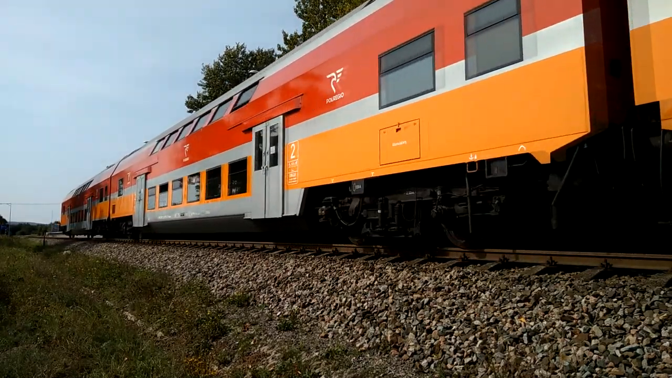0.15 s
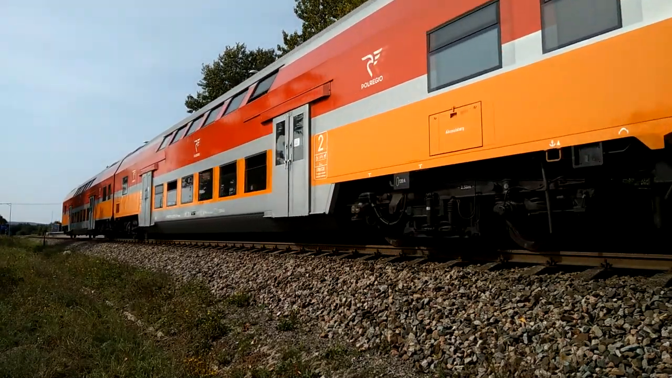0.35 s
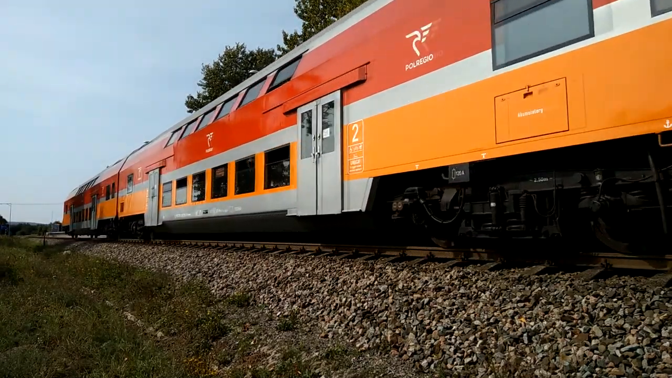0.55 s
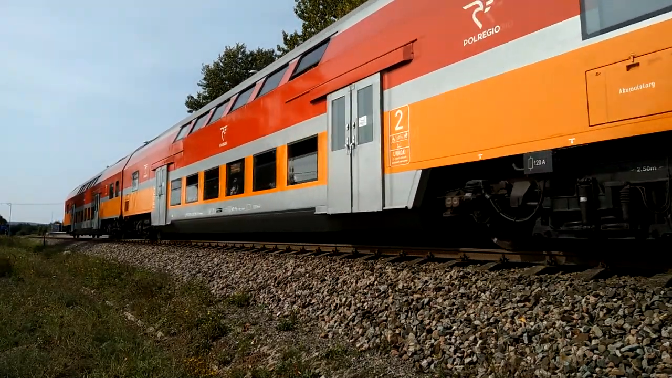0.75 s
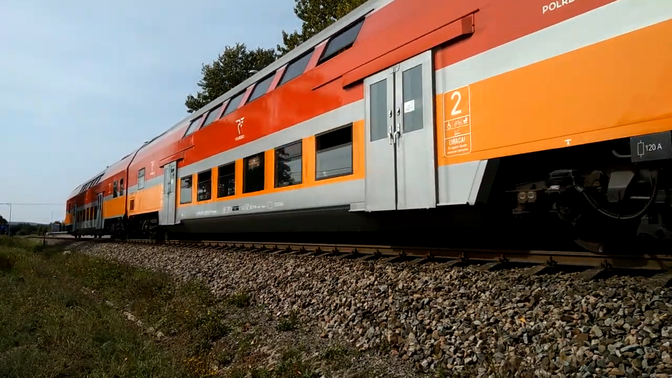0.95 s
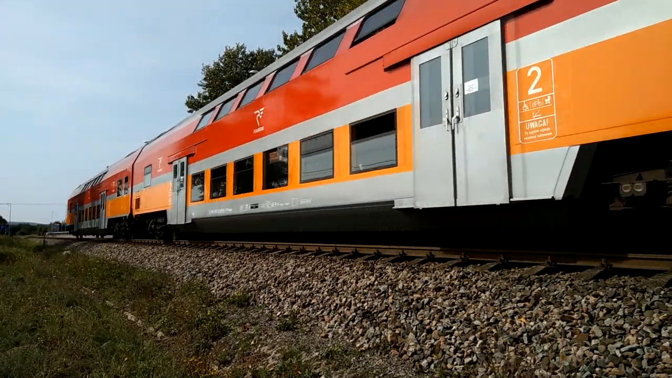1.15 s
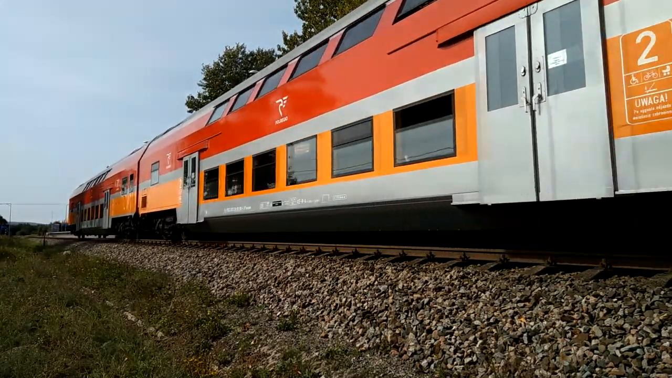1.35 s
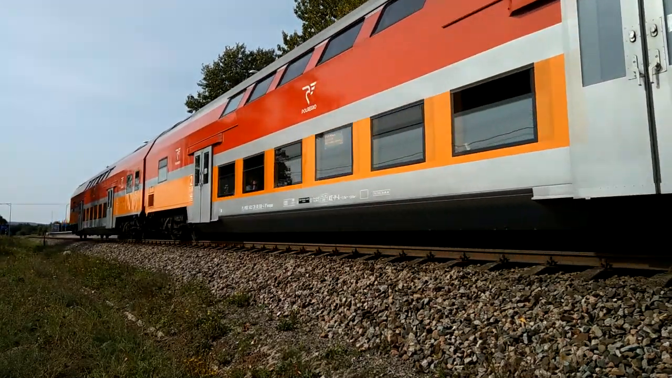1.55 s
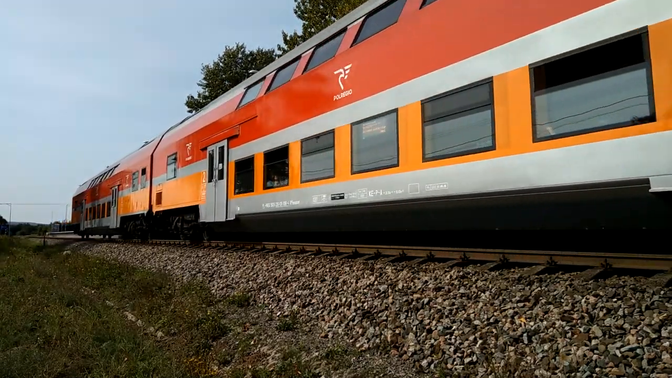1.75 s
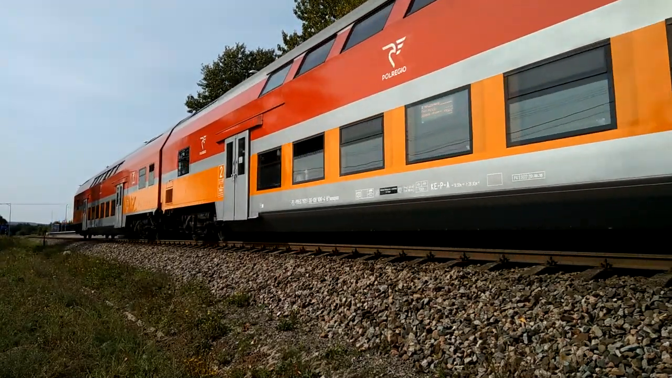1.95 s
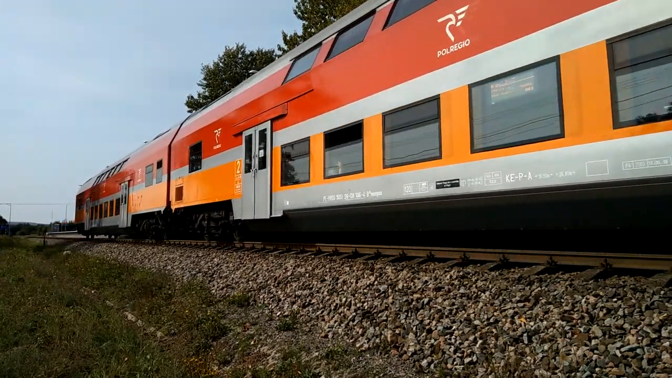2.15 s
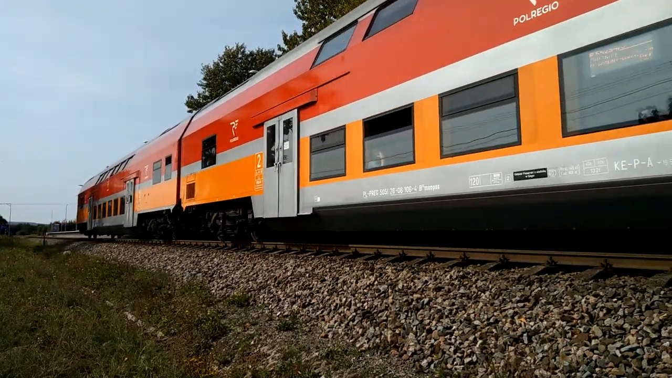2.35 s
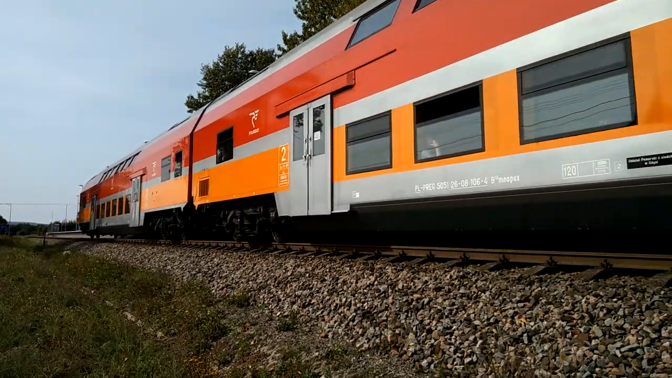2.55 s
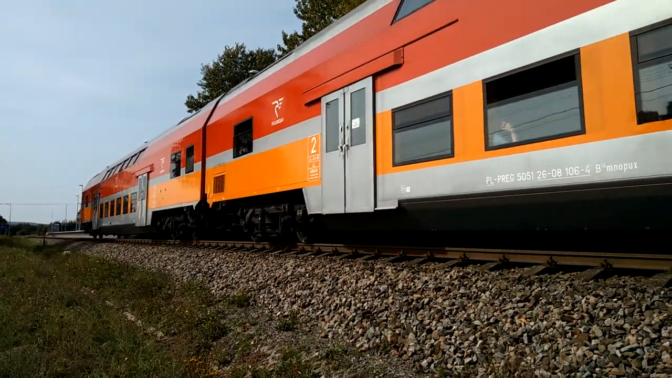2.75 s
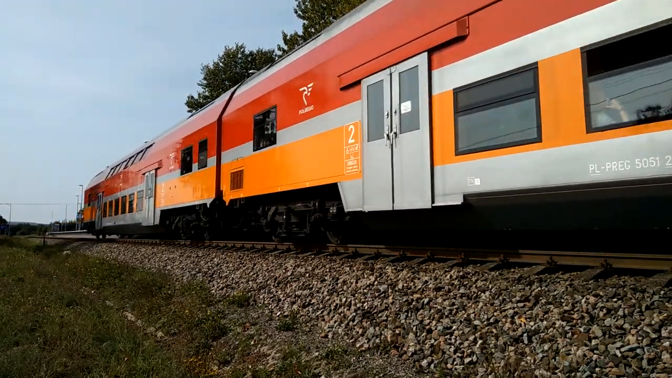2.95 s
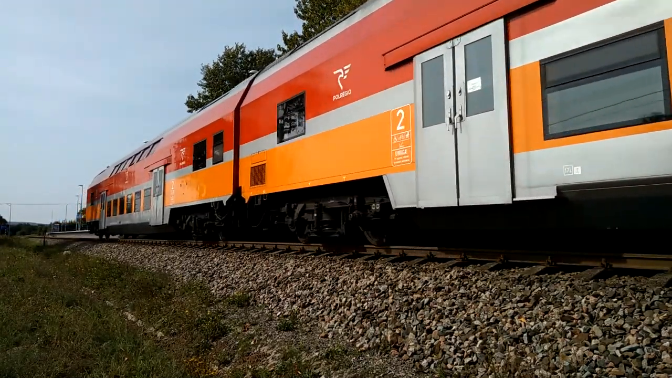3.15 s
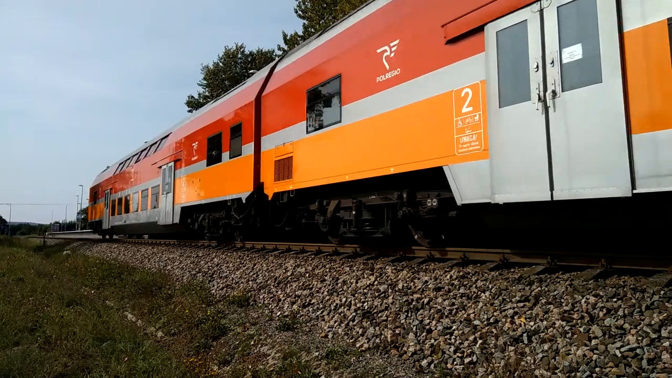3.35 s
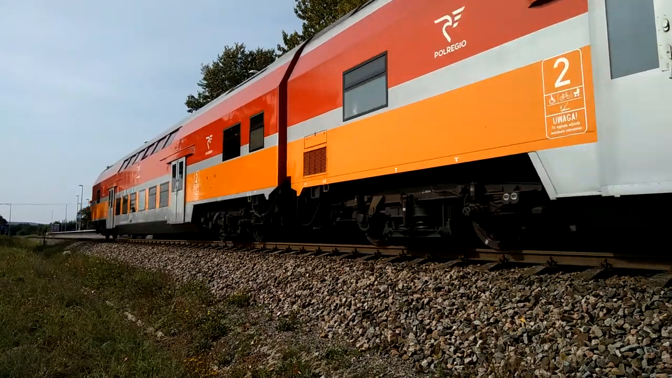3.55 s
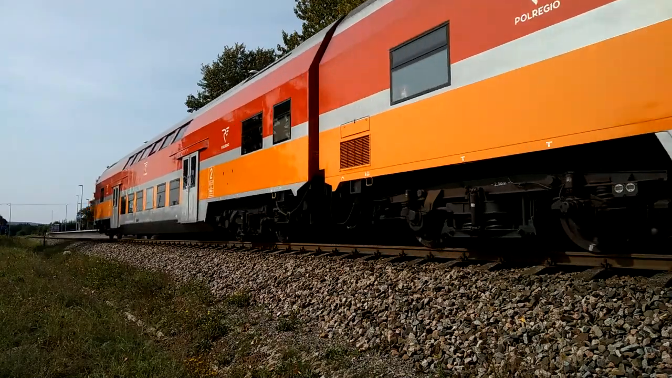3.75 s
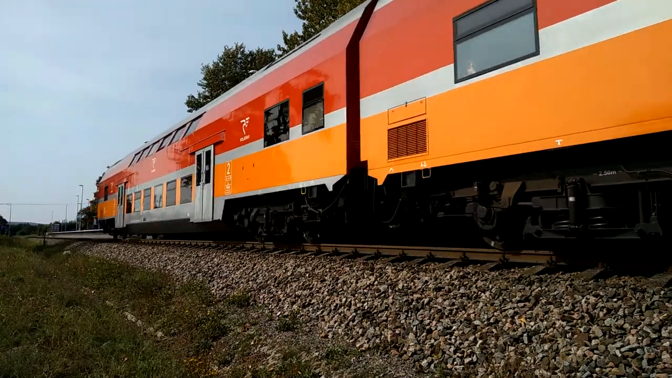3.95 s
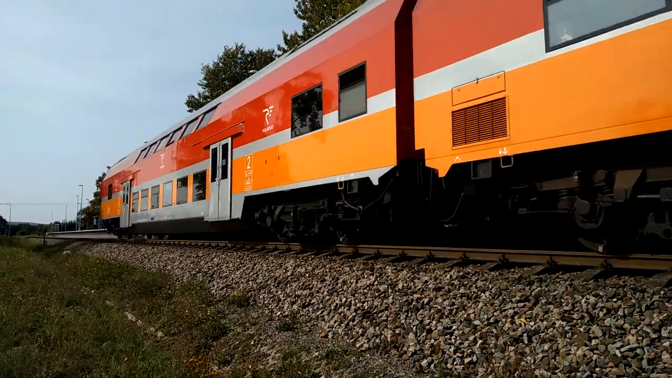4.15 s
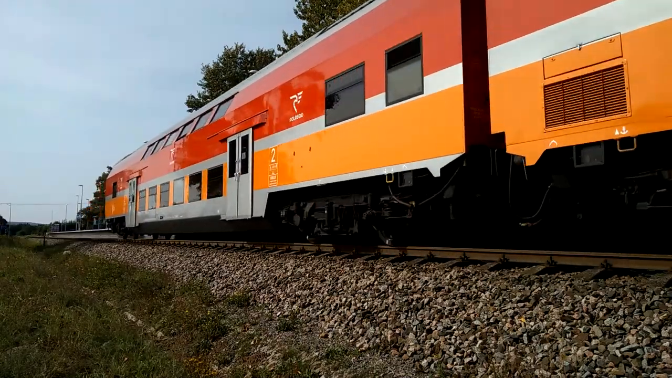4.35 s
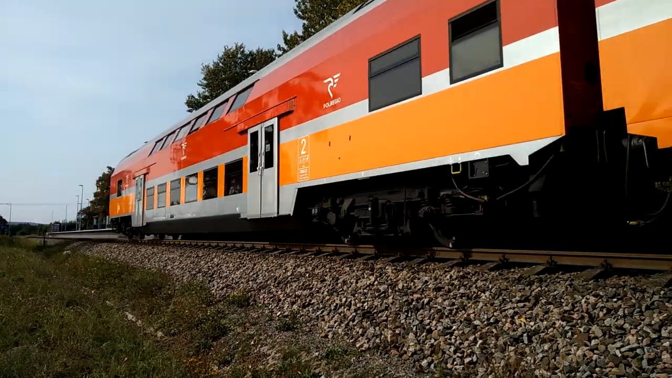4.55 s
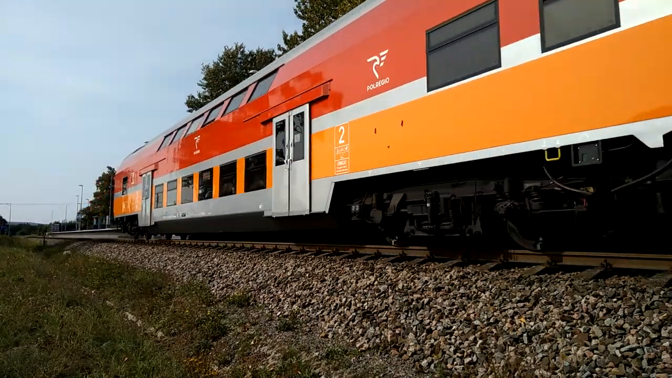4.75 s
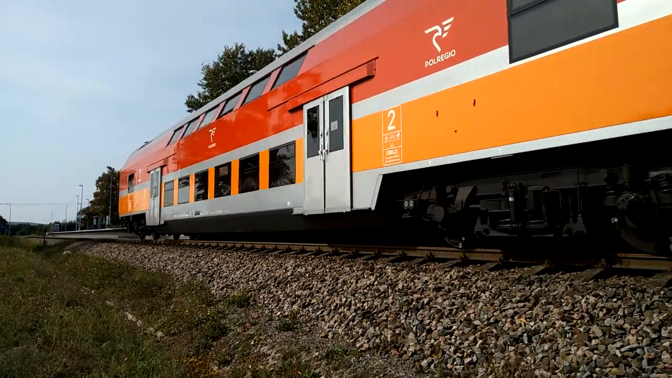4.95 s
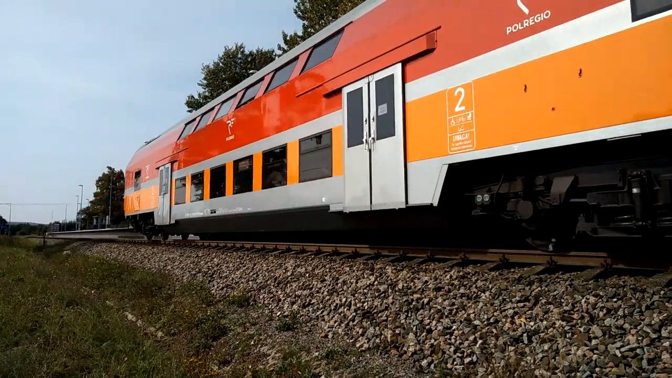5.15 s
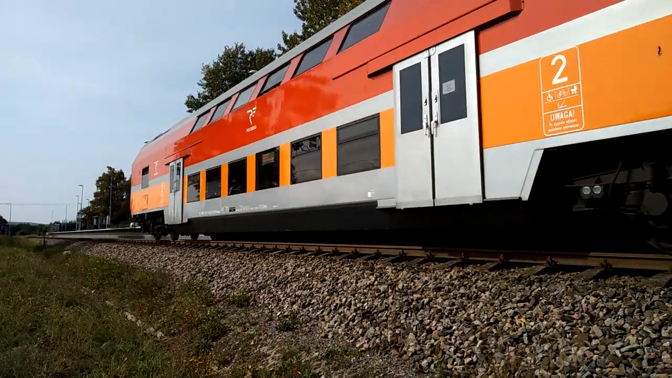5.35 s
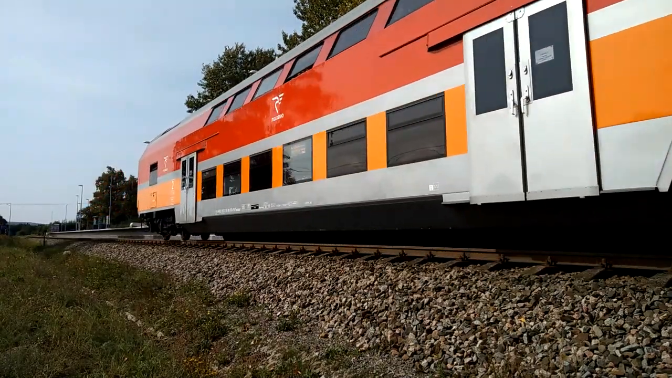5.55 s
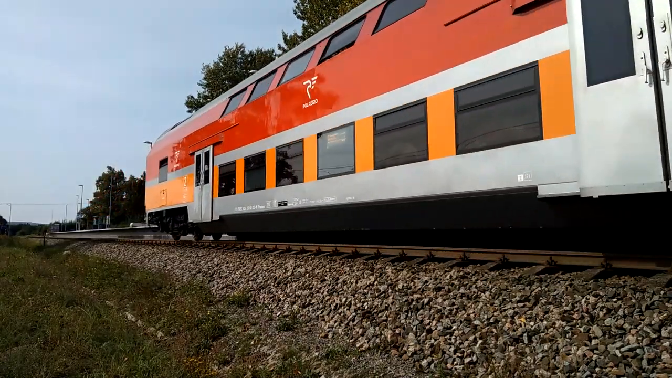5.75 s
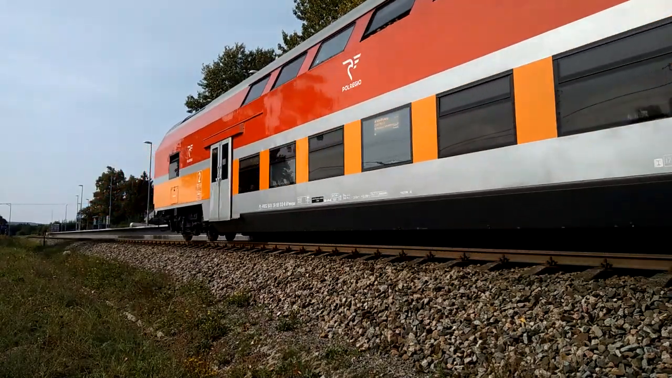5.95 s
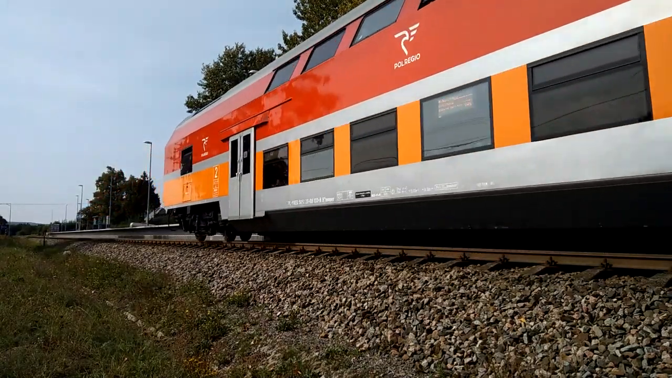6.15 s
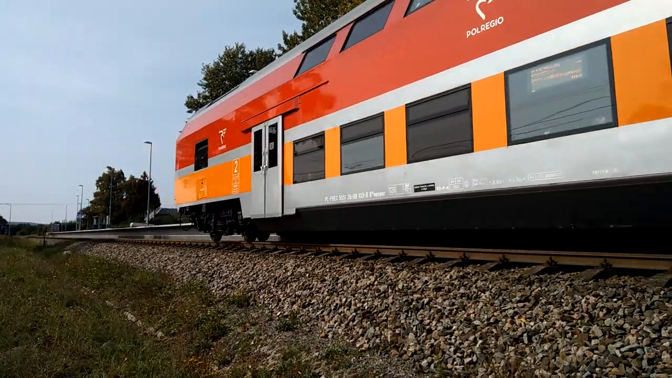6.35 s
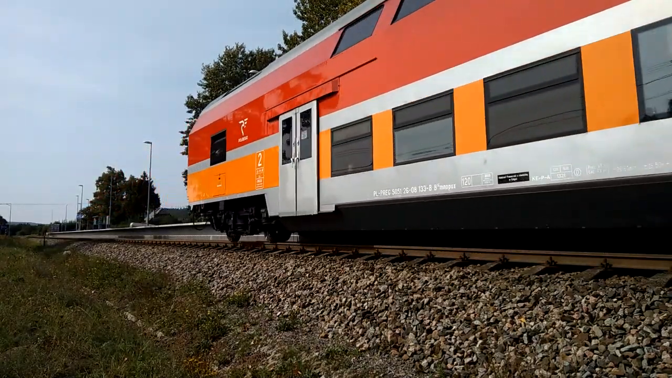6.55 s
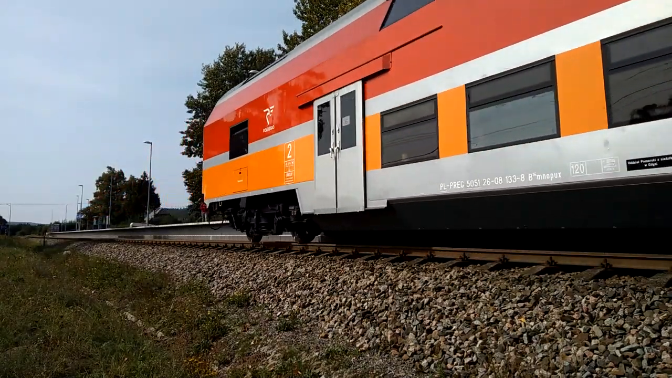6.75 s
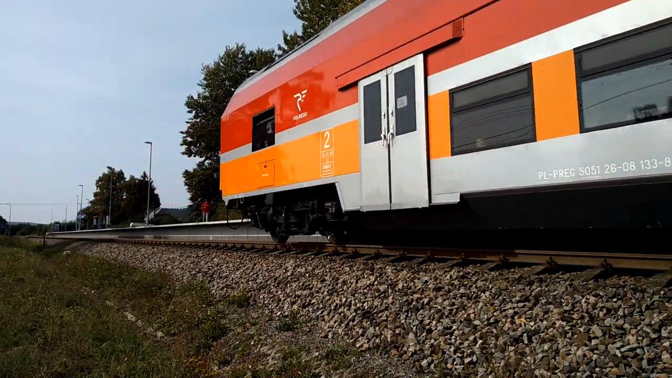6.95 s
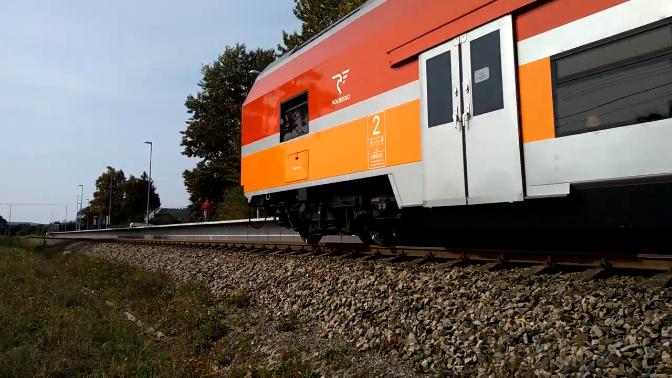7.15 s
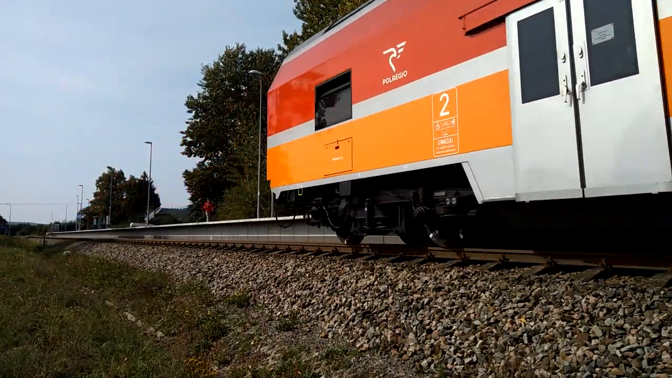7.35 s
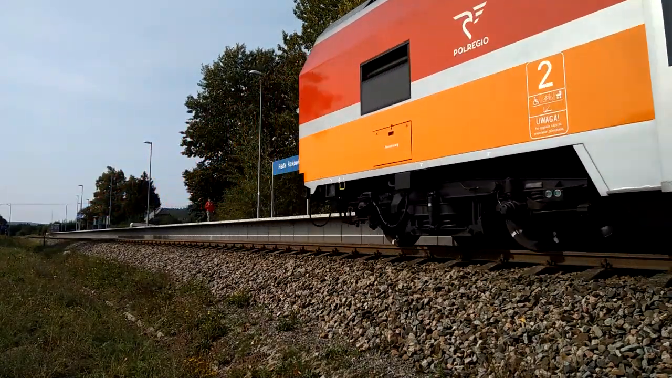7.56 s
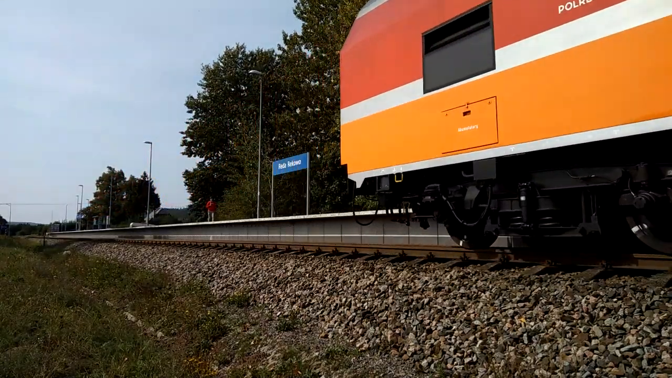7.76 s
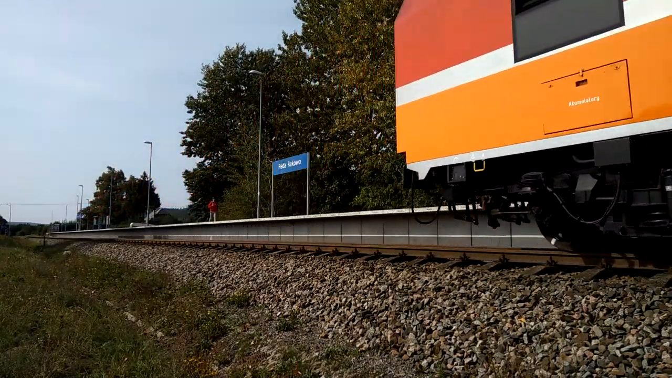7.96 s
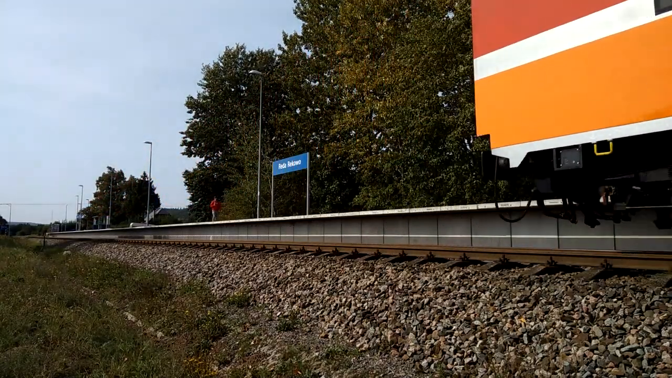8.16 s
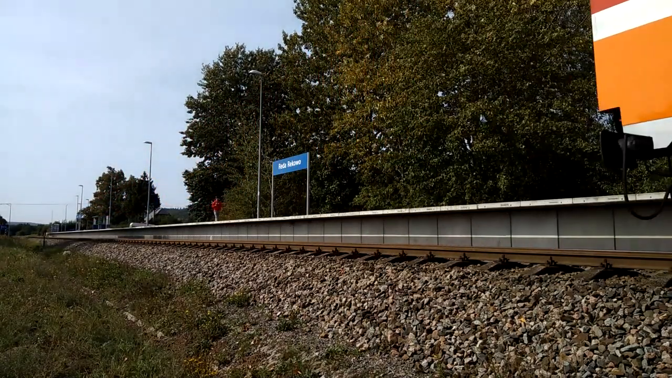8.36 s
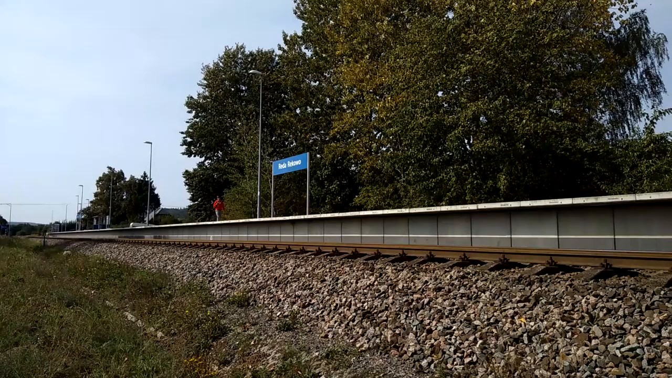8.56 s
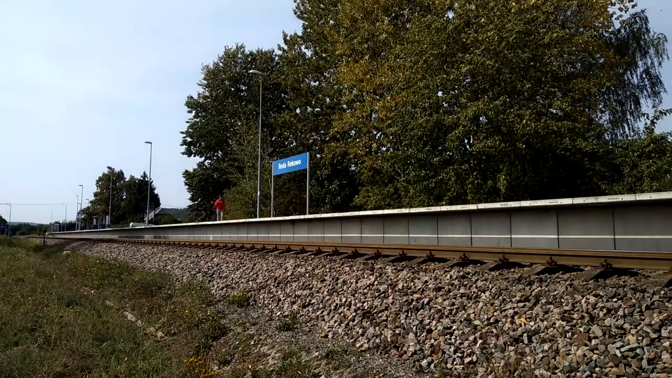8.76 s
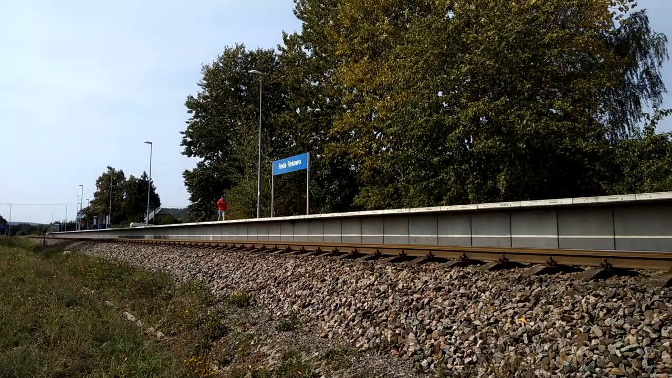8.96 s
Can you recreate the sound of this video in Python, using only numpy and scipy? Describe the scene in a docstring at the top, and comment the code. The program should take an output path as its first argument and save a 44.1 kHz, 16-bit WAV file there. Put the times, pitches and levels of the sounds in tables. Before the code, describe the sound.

A diesel train passes close by and fades: throbbing exhaust, rumbling wheels, a few hollow knocks and brief steel squeaks.

```python
"""A diesel locomotive, already past, hauls double-deck coaches by a microphone beside the track.
At first its exhaust throbs and a cooling fan hums briefly; rough wheels roar, rails hiss under each bogie.
As the engine recedes, slack running gear knocks from 3.2 s on, and a wheel rings at 4.7 s.
Around 7 s steel sticks and slips on the last coach: three short squeaks stand out.
After 8 s its wake buffets the microphone and its wheels ring as they leave."""
import sys
import numpy as np
from scipy import signal
from scipy.fft import rfft, irfft
from scipy.io import wavfile
from scipy.ndimage import uniform_filter1d

SR = 44100
rng = np.random.default_rng(int(sys.argv[2]) if len(sys.argv) > 2 else 0)


def to_wav(sig):
    """Store sig (one row per channel, or 1-D mono) as 16-bit WAV at the path in sys.argv[1].

    Samples outside -1..1 are clipped; the rate is SR.
    """
    pcm = np.clip(np.atleast_2d(sig), -1, 1) * 32767
    pcm = np.round(pcm).astype(np.int16)
    wavfile.write(sys.argv[1], SR, pcm.T)  # frames by channels


N = 401310
TIME = np.arange(N) / SR
TRAIN_M_PER_S, TRACK_DISTANCE_M = 6.16, 4.4
CUTOFF_HZ = 15720


def amp(db):
    """Decibels to gain."""
    return 10 ** (np.asarray(db) / 20)


def unit(x):
    """Scales to rms 1."""
    return x / np.sqrt(np.mean(x ** 2) + 1e-20)


def bump(x, centre, half_width):
    """Bell of height 1, down to 1/e at half_width."""
    return np.exp(-((x - centre) / half_width) ** 2)


def curve(rows, t):
    """Linear interpolation in time."""
    return np.interp(t, *np.transpose(rows))


def spectrum(points, hz):
    """Linear interpolation in log frequency."""
    f, value = np.transpose(points)
    return np.interp(np.log(hz + 1), np.log(f), value)


def add(mix, start_s, sound):
    """Adds a stereo sound into the mix."""
    part = mix[:, max(round(start_s * SR), 0):][:, :sound.shape[1]]
    part += sound[:, :part.shape[1]]


def ports(x, lead_ms):
    """The left microphone port hears x lead_ms before the right."""
    t_ms = np.arange(len(x)) * 1000 / SR
    return np.array([x, np.interp(t_ms - lead_ms, t_ms, x)])


def drift(rate_hz, size=2 ** 19):
    """Smooth random wander, rms about 1, up to about rate_hz."""
    lowpass = bump(np.fft.rfftfreq(size, 1 / SR), 0, rate_hz)
    return unit(irfft(rfft(rng.standard_normal(size)) * lowpass))[:N]


def farness(t):
    """0 while the locomotive is near, 1 once it is far."""
    return np.clip((t - 1.0) / 2.5, 0, 1)


def receding_db(t, start_m, doubling_db):
    """A source start_m away at first loses doubling_db per doubling of distance."""
    return -doubling_db * np.log2(1 + TRAIN_M_PER_S * t / start_m)


# Main noise direction: t/s, side (-1 right to 1 left, clipped)
NOISE_SIDE = [(0, -1.4), (1, -0.51), (2, 0.016), (4, 0.59), (5, 0.96), (7, 1), (8.2, 0.95)]
# Sound arriving direct: f/Hz, share (0-1)
DIRECT_SHARE = [(60, 0.81), (150, 0.98), (300, 0.98), (1400, 1), (2600, 0.7), (5000, 0), (14000, 0)]


def track_noise(colour_db, patchy_db, size=4096, port_gap_ms=0.42):
    """Noise of rms 1 with flickering patches, reaching both ports from all along the track."""
    hop = size // 4
    hz = np.fft.rfftfreq(size, 1 / SR)
    t = np.arange(N // hop + 5)[:, None] * hop / SR
    left_re, left_im, diffuse_re, diffuse_im, patches = rng.standard_normal((5, len(t), len(hz)))
    left, diffuse = left_re + 1j * left_im, diffuse_re + 1j * diffuse_im
    patches = unit(uniform_filter1d(uniform_filter1d(patches, size=9, axis=0), size=12, axis=1))
    # 32 directions, each reaching the nearer port first
    bearing = np.cos(np.pi * (np.arange(32) + .5) / 32)[:, None]
    delays = np.exp(-2j * np.pi * hz * bearing * port_gap_ms / 1000)
    side = np.clip(curve(NOISE_SIDE, t), -1, 1)
    direct = np.clip(spectrum(DIRECT_SHARE, hz), 0, .995)
    coherence = direct * (delays.mean(0) + side * (bearing * delays).mean(0))
    right = coherence * left + np.sqrt(np.maximum(1 - abs(coherence) ** 2, 0)) * diffuse
    frames = np.array([left, right]) * amp(colour_db(t, hz) + patchy_db * patches)
    _, noise = signal.istft(frames.swapaxes(1, 2), nperseg=size, noverlap=size - hop)
    return unit(noise[:, :N])


def resonance(t, hz, centre_hz, width_hz, wax_share=0.16):
    """Spectral peak whose height waxes and wanes around 1."""
    rates_hz, phases = rng.uniform(.4, 3.5, 10), rng.random(10)
    waxing = unit(np.sin(2 * np.pi * (rates_hz * t + phases)).sum(1, keepdims=True))
    return (1 + wax_share * waxing) * bump(hz, centre_hz, width_hz) ** 2


# Wheel and track resonances: f/Hz, width/Hz, near lift/dB, far lift/dB
WHEEL_TRACK_MODES = [(463.5, 37, 6, 4), (718, 21, 2.5, 6), (803.7, 15, 5, 8), (990, 67, -1.5, 0.5),
                     (1614, 155, -2.5, 2.5), (2680, 140, -2, 1)]
# Hollow coach bodies: f/Hz, width/Hz, near lift/dB, far lift/dB
COACH_MODES = [(200.8, 11.8, 5, 6.5), (238.2, 6.6, 5.5, 5), (426, 15, -3.5, 2), (517.5, 44, 1.5, 5),
               (605.6, 18, 1.5, 9.5)]
# Open track behind the last coach: f/Hz, width/Hz, lift/dB
OPEN_TRACK_MODES = [(260, 27, 9), (510, 65, 7), (1720, 70, 5.5), (2120, 110, 2)]
# Parts humming out in turn: t/s, half length/s, f/Hz, lift/dB
PART_HUMS = [(0.303, 0.97, 238, 3.5), (1.004, .2, 728, 2), (1.9, 1.04, 742, 7), (2.256, 1.2, 332, 14.5),
             (3.8, 1.5, 466, 4.5), (5.08, 0.37, 734, 13.5), (7.304, 0.27, 800, 5), (7.7, 0.23, 1004, 7),
             (7.7, 0.94, 427, 7)]


def ringing_db(t, hz, train_end_s=8.05, crossfade_s=0.38, hum_width_share=0.039):
    """Lift of the noise by resonances and hums; the coaches take theirs with them."""
    far = farness(t)
    behind = (1 + np.tanh((t - train_end_s) / crossfade_s)) / 2
    track, coaches = (sum((near_db + far * (far_db - near_db)) * resonance(t, hz, f, width_hz)
                          for f, width_hz, near_db, far_db in modes)
                      for modes in (WHEEL_TRACK_MODES, COACH_MODES))
    open_track = sum(db * resonance(t, hz, f, width_hz) for f, width_hz, db in OPEN_TRACK_MODES)
    hums = sum(db * bump(t, s, half_s) * bump(hz, f, hum_width_share * f) ** 2
               for s, half_s, f, db in PART_HUMS)
    return track + (1 - behind) * coaches + behind * open_track + hums


# Engine working cycles: t/s, rate/Hz
CYCLE_RATE = [(1.6, 8.09), (3.6, 8.18), (9.1, 8.19)]
# Exhaust lines: order (multiple of the cycle rate), near level/dB, far level/dB
EXHAUST_LINES = [(4, -23, -12.5), (5, -30, -21), (6.5, -1, -8), (7, -6, -2.5), (8, -5.5, -7), (9, -3, -3.5),
                 (10, -2, -7), (11, -7, -7), (12, -1, -1), (13, -11, -6.5), (14, -8.5, -13), (16, -3, -6.5),
                 (18, -13.5, -11)]
# Single lines booming: t/s, half length/s, order, lift/dB
LINE_BOOMS = [(0.603, 0.32, 9, 6.5), (1.8, 0.26, 16, 4), (1.8, 0.33, 18, 11), (3.105, 0.27, 16, 5.5),
              (3.8, 0.97, 8, 5), (4.647, 0.31, 16, 4.5), (5.388, 0.67, 9, 10), (5.6, 0.43, 12, 0),
              (6.25, 0.25, 8, 8), (6.29, 0.27, 16, 4.5)]
# Exhaust rumble: f/Hz, level/dB
RUMBLE_SPECTRUM = [(20, -38), (40, -29), (54, -3), (72, 0), (82, -4), (105, -1), (145, -6), (165, -6.5),
                   (235, -13), (290, -14), (400, -24.5), (800, -60)]
# Exhaust swelling and sinking: t/s, level/dB
EXHAUST_SWELL = [(0, 0.5), (.9, 1.2), (1.3, 0.5), (3.1, 2), (3.9, -0.5), (5.7, 0), (6.3, 1.5), (6.8, -1.5),
                 (7.7, -1), (8.5, 1.5), (9.1, -0.5)]


def exhaust(lines_db=-19.0, rumble_db=-20.5, fading_db=1.57, jitter_turns=0.028, smear_turns=0.76,
            beats_per_cycle=4, throb=0.26, limp=0.15):
    """Unequal cylinders repeat each cycle: a receding stack of lines over puffs of rumble."""
    cycles = np.cumsum(curve(CYCLE_RATE, TIME)) / SR
    far, slow_t, drone = farness(TIME), np.linspace(0, N / SR, 600), np.zeros(N)
    for order, near_db, far_db in EXHAUST_LINES:
        # shifting air wavers each line's level and phase
        rates_hz, phases = rng.uniform(.1, 1.6, (2, 12, 1)), rng.random((2, 12, 1))
        wavers = np.sin(2 * np.pi * (rates_hz * slow_t + phases)).sum(1)
        fade, slip = (np.interp(TIME, slow_t, unit(waver)) for waver in wavers)
        boom_db = sum(db * bump(TIME, s, half_s) for s, half_s, line, db in LINE_BOOMS if line == order)
        line_db = near_db + far * (far_db - near_db) + boom_db + fading_db * fade
        smear = smear_turns * rng.random()  # echoes smear each cycle's pulse
        drone += amp(line_db) * np.sin(2 * np.pi * (order * cycles + smear + jitter_turns * slip))
    beat_rad = 2 * np.pi * beats_per_cycle * cycles
    puffs = 1 + throb * np.cos(beat_rad) + limp * np.cos(beat_rad / 2)  # every other beat is stronger
    rumble = track_noise(lambda t, hz: spectrum(RUMBLE_SPECTRUM, hz) + ringing_db(t, hz),
                         patchy_db=1, size=8192)
    drone_gain = amp(lines_db + receding_db(TIME, start_m=23.4, doubling_db=7.0))
    rumble_gain = amp(rumble_db + receding_db(TIME, start_m=21.4, doubling_db=6.0))
    return amp(curve(EXHAUST_SWELL, TIME)) * (drone_gain * drone + rumble_gain * puffs * rumble)


# Bogies abreast of the microphone: t/s, level/dB re bogie_db
BOGIE_PASSES = [(.55, -14), (1.7, -2), (4.85, 1), (5.8, -1.5), (8.35, 0.5)]


def rolling_gain(locomotive_db, start_m, doubling_db, bogie_db, beam=1.32):
    """Receding locomotive plus passing bogies; wheels radiate sideways, so fade faster (beam > 1)."""
    bogie_power = sum(amp(db) ** 2 / (1 + (TRAIN_M_PER_S * (TIME - s) / TRACK_DISTANCE_M) ** 2) ** beam
                      for s, db in BOGIE_PASSES)
    locomotive = amp(locomotive_db + receding_db(TIME, start_m, doubling_db))
    return np.sqrt(locomotive ** 2 + amp(bogie_db) ** 2 * bogie_power)


# Wheel roar, locomotive near and far: f/Hz, level/dB
NEAR_ROAR_SPECTRUM = [(120, -60), (200, -6), (320, -1.5), (385, -5.5), (480, -5.5), (600, -9.5),
                      (850, -8.5), (1100, -10), (1500, -16), (2200, -29), (4000, -48.5)]
FAR_ROAR_SPECTRUM = [(120, -55), (200, 0.5), (270, -3.5), (350, -8.5), (430, -2.5), (560, -8.5),
                     (850, -6.5), (1100, -7.5), (1500, -12), (2200, -29), (4000, -60)]


def wheel_roar(judder_db=0.5, surge_db=1, surge_s=0.22):
    """Rough treads shake bogies and track: a roar that thins as the train draws away."""
    def colour_db(t, hz):
        near_db, far_db = spectrum(NEAR_ROAR_SPECTRUM, hz), spectrum(FAR_ROAR_SPECTRUM, hz)
        return near_db + farness(t) * (far_db - near_db) + ringing_db(t, hz)
    gain = rolling_gain(locomotive_db=-19.5, start_m=12.6, doubling_db=7.5, bogie_db=-44.0)
    surge = amp(surge_db * bump(TIME, 0, surge_s))  # locomotive's rear bogie still close
    judder = amp(judder_db * drift(rate_hz=11))
    return gain * surge * judder * track_noise(colour_db, patchy_db=1.55)


# Rail hiss and contact sizzle: f/Hz, level/dB
HISS_SPECTRUM = [(600, -10), (1200, -7.5), (1550, 1), (1830, -1), (2150, 0.4), (2700, -2.5), (3300, -5.5),
                 (4200, -8), (4800, -12.5), (5200, -18), (5500, -56), (6500, -39), (9000, -60)]
SIZZLE_SPECTRUM = [(3000, -26), (5500, 8), (6300, 0.5), (7000, 6.5), (8000, 0), (9500, 1.5), (11200, 0),
                   (12000, 7), (13200, 3.5), (14300, 3), (15600, -35)]
# Flanges grinding on the rail: t/s, half length/s, lift/dB
FLANGE_GRINDS = [(4.85, 0.36, 1), (6.05, 0.52, 2), (8.5, 0.7, 2.5)]


def rail_hiss(flutter_db=0.79, grind_hz=2300, grind_width_hz=680):
    """Rails hiss under each bogie, flanges grind in swells and the contact patches sizzle."""
    def colour_db(t, hz):
        grind_db = sum(db * bump(t, s, half_s) for s, half_s, db in FLANGE_GRINDS)
        grind_band = bump(hz, grind_hz, grind_width_hz)
        return spectrum(HISS_SPECTRUM, hz) + ringing_db(t, hz) + grind_db * grind_band
    hiss = track_noise(colour_db, patchy_db=1.87)
    sizzle = track_noise(lambda t, hz: spectrum(SIZZLE_SPECTRUM, hz), patchy_db=3.5, size=1024)
    sizzle *= amp([[2.5], [-3.5]])  # left, right
    hiss_gain = rolling_gain(locomotive_db=-31.5, start_m=9.35, doubling_db=5.5, bogie_db=-41.0)
    sizzle_gain = rolling_gain(locomotive_db=-50.5, start_m=4.9, doubling_db=6, bogie_db=-58.5)
    return (hiss_gain * hiss + sizzle_gain * sizzle) * amp(flutter_db * drift(rate_hz=33))


def cooling_fan(hz=187.0, level_db=-21.5, loudest_s=0.47, half_s=0.29, waver_hz=2.6, flutter_db=2):
    """A fan hums from the locomotive's side and is soon out of earshot."""
    tone = np.sin(2 * np.pi * np.cumsum(hz + waver_hz * drift(rate_hz=9.4)) / SR)
    return amp(level_db + flutter_db * drift(rate_hz=8)) * bump(TIME, loudest_s, half_s) * tone


# Squeaks and scrapes: middle t/s, level/dB, f/Hz, length/s, width/Hz
STEEL_SQUEAKS = [(0.101, -28, 2670, 0.049, 593), (1.873, -41.5, 3380, 0.039, 600),
                 (3.228, -44, 14200, 0.037, 250), (3.38, -41.5, 3550, 0.036, 400),
                 (5.762, -46, 13600, 0.064, 1300), (5.765, -46, 10300, .05, 500),
                 (6.04, -49, 15000, 0.025, 700), (6.248, -40.5, 5020, 0.037, 450),
                 (6.62, -43, 3970, 0.035, 150), (6.685, -37.5, 3910, 0.059, 85),
                 (6.868, -32.5, 3930, 0.043, 60), (7.208, -27, 3900, 0.024, 34.8),
                 (7.217, -33.5, 3906, 0.026, 430), (7.223, -46, 4430, 0.022, 400)]


def squeaks(echo_db=-8, echo_t60_s=0.32, lead_ms=0.258, octave_db=-34):
    """Steel sticks and slips for a moment; coach sides and ballast scatter the chirp."""
    out, t = np.zeros((2, N)), np.arange(SR // 4) / SR
    for middle_s, db, hz, length_s, width_hz in STEEL_SQUEAKS:
        pole = np.exp(-2 * np.pi * width_hz / SR)
        waver = unit(signal.lfilter([1], [1, -pole], rng.standard_normal(len(t))))
        phase = 2 * np.pi * np.cumsum(hz + width_hz / 2 * waver) / SR
        octave = (2 * hz < CUTOFF_HZ) * amp(octave_db) * np.sin(2 * phase)
        swell = np.sin(np.pi * np.minimum(t / length_s, 1)) ** 2
        chirp = swell * (np.sin(phase) + octave)
        scatter = rng.standard_normal((2, len(t))) * amp(-60 * t / echo_t60_s)
        scatter /= np.linalg.norm(scatter[0])
        echo = signal.fftconvolve(chirp[None], scatter, axes=1)[:, :len(t)]
        add(out, middle_s - length_s / 2, amp(db) * (ports(chirp, lead_ms) + amp(echo_db) * echo))
    return out


def pulse(t, rise_s):
    """Envelope that reaches 1 at rise_s, then dies away."""
    return (t / rise_s * np.exp(1 - t / rise_s)) ** 2


# Running gear knocks: t/s, level/dB, f/Hz, rise/s, rattle/dB re the blow, left lead/ms
GEAR_KNOCKS = [(3.2046, -10, 497, 0.0018, -10.5, 0.2), (3.2105, -20, 430, .003, -4, 0.18),
               (3.2175, -28, 684, .003, -9, .14), (3.644, -19.5, 510, 0.0045, -6, 0),
               (5.7442, -20.5, 690, 0.0037, -5.5, 0.29), (5.755, -24.5, 260, 0.0026, -2, 0.29),
               (5.774, -30, 740, 0.0026, -4, 0.29), (5.796, -29, 656, 0.0049, -6, 0.21),
               (7.752, -30, 506, 0.0095, -6, 0.087), (8.113, -26.5, 430, 0.0094, 2, 0.27)]


def knocks(rattle_t60_s=0.18, sharp_share=1.09, drop_s=0.0016):
    """Slack in the running gear closes: a few heavily damped swings, then the frame rattles."""
    out, t = np.zeros((2, N)), np.arange(SR // 3) / SR
    for start_s, db, hz, rise_s, rattle_db, lead_ms in GEAR_KNOCKS:
        pitch_hz = hz * (1 + sharp_share * np.exp(-t / drop_s))  # high bending waves arrive first
        blow = pulse(t, rise_s) * np.sin(2 * np.pi * np.cumsum(pitch_hz) / SR)
        band = signal.butter(2, [.7 * hz, 1.35 * hz], "band", fs=SR, output="sos")
        rattle = unit(signal.sosfilt(band, rng.standard_normal(len(t))))
        rattle *= amp(rattle_db - 60 * t / rattle_t60_s) * (1 - np.exp(-t / (2 * rise_s)))
        add(out, start_s, amp(db) * ports(blow + rattle, lead_ms))
    return out


# Single wheel modes ringing out: t/s, level/dB, f/Hz, rise/s
WHEEL_RINGS = [(4.63, -44, 2710, 0.027), (4.675, -31, 1555, .02), (4.68, -51, 1722, .02),
               (8.385, -42, 1700, .025), (8.559, -41, 1685, 0.032), (8.63, -40, 2445, 0.016),
               (8.665, -39, 1675, .025), (9.015, -37, 2025, 0.018), (9.018, -41, 2570, 0.011)]


def wheel_rings(waver_hz=14, lead_ms=0.41):
    """A rough patch of rail sets a wheel ringing; the tone swells, wavers and dies."""
    out, t = np.zeros((2, N)), np.arange(SR // 3) / SR
    for start_s, db, hz, rise_s in WHEEL_RINGS:
        waver = unit(uniform_filter1d(rng.standard_normal(len(t)), size=300))
        tone = np.sin(2 * np.pi * np.cumsum(hz + waver_hz * waver) / SR)
        add(out, start_s, amp(db) * ports(pulse(t, rise_s) * tone, lead_ms))
    return out


# Gusts behind the last coach: t/s, half length/s, level/dB
WAKE_GUSTS = [(8.123, 0.058, -36), (8.466, .03, -37), (8.7, 0.33, -33.5), (9.017, 0.048, -25)]


def wake(band_hz=(78, 125)):
    """Eddies behind the train push on each port separately."""
    band = signal.butter(2, band_hz, "band", fs=SR, output="sos")
    eddies = unit(signal.sosfilt(band, rng.standard_normal((2, N))))
    return eddies * sum(amp(db) * bump(TIME, s, half_s) for s, half_s, db in WAKE_GUSTS)


def scene():
    """The whole train, in stereo."""
    return (exhaust() + wheel_roar() + rail_hiss() + cooling_fan()
            + squeaks() + knocks() + wheel_rings() + wake())


def record(dry):
    """The left port is louder than the right except around 8 kHz; both are band-limited."""
    hz = np.fft.rfftfreq(N, 1 / SR)
    left_over_right_db = spectrum([(60, 1.0), (700, 1.5), (4000, 2.0), (8000, -5.5), (12500, 7.0)], hz)
    port_gains = amp([left_over_right_db / 2, -left_over_right_db / 2])
    heard = irfft(rfft(dry) * port_gains, N)
    lowpass = signal.firwin(511, CUTOFF_HZ, window=("kaiser", 9), fs=SR)
    return signal.oaconvolve(heard, lowpass[None], "same")


dry = scene()
out = record(dry)
to_wav(out)
```